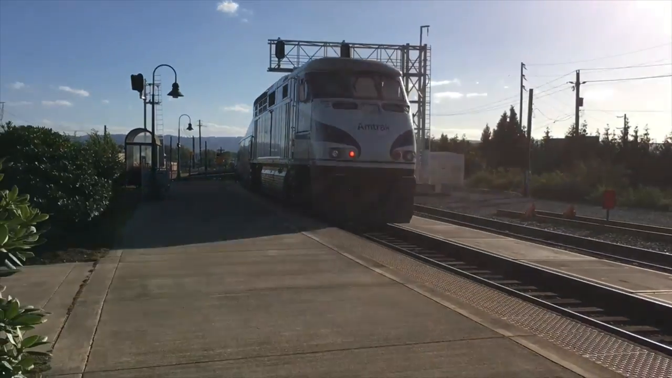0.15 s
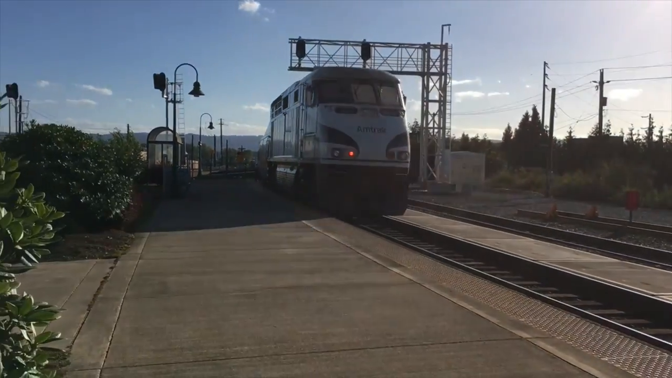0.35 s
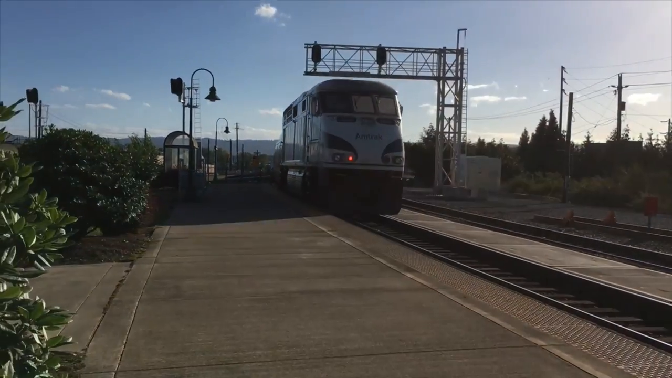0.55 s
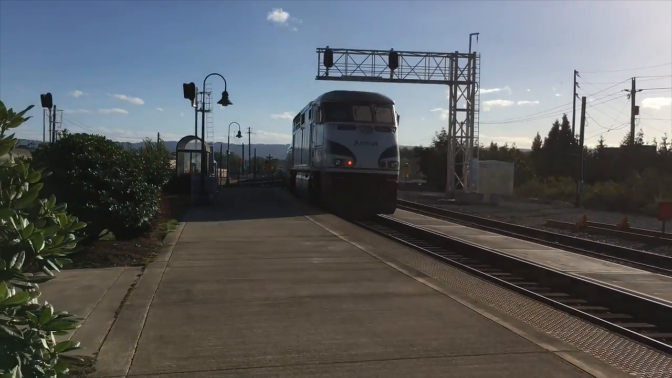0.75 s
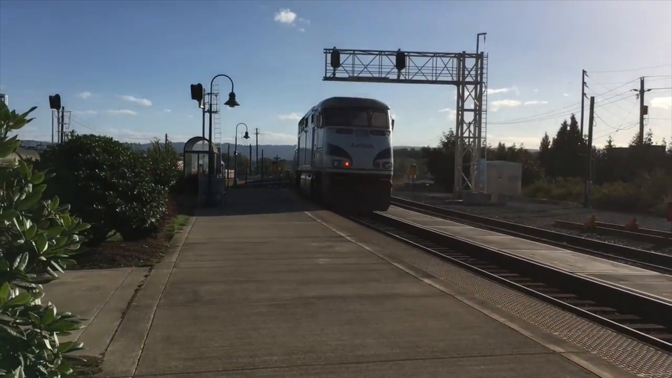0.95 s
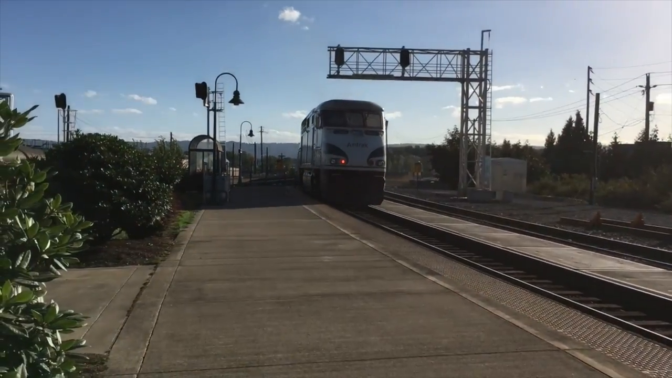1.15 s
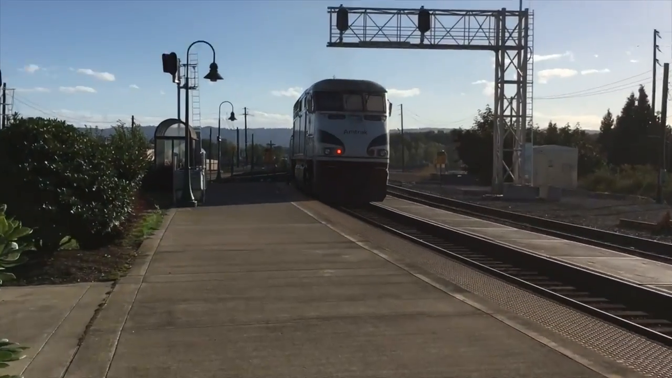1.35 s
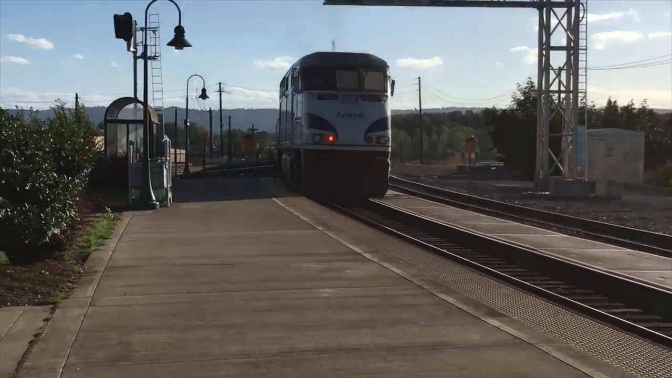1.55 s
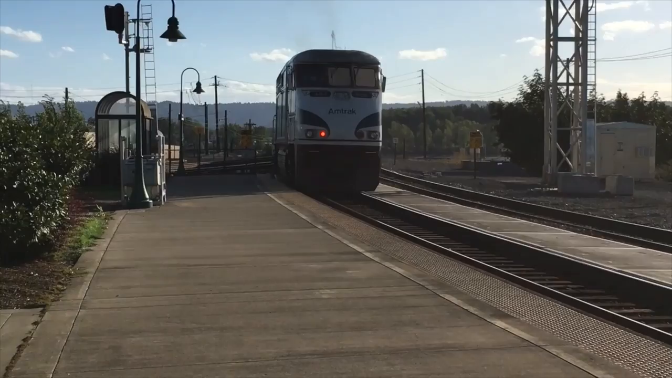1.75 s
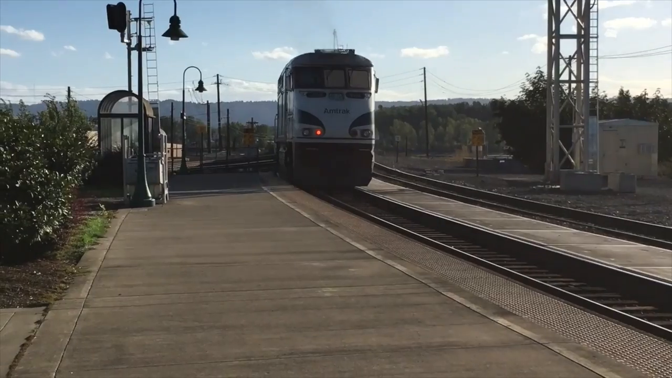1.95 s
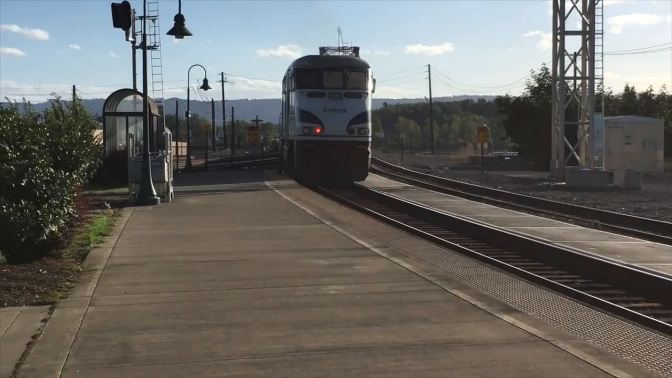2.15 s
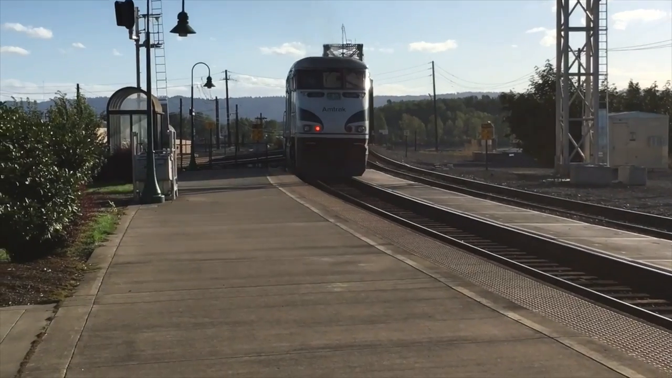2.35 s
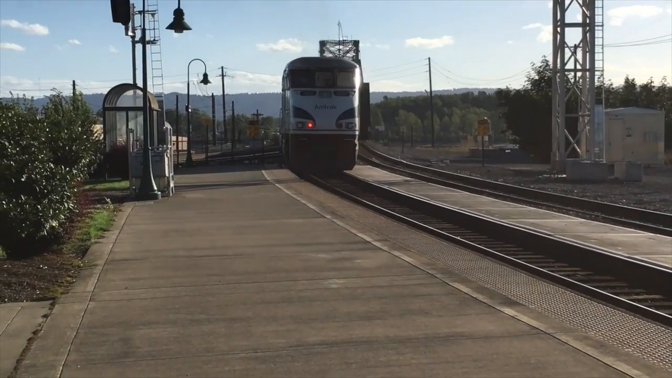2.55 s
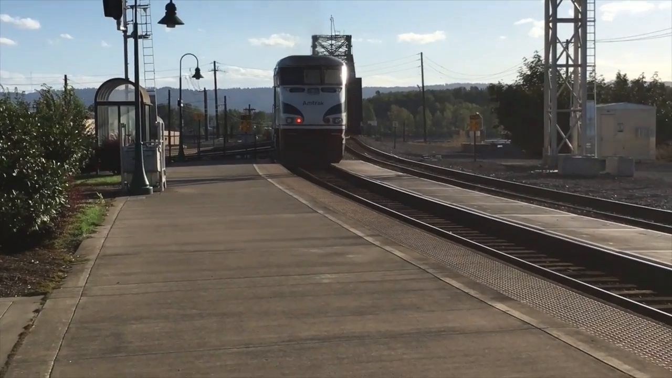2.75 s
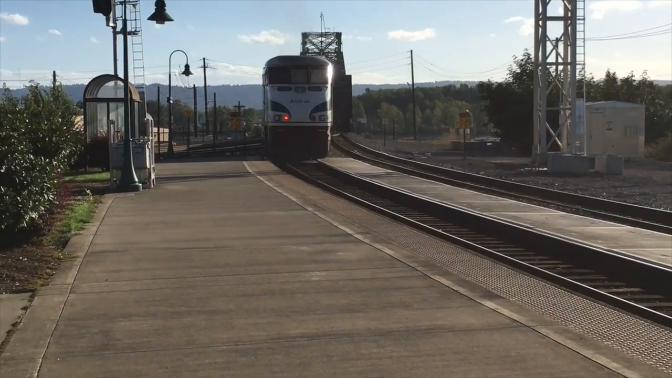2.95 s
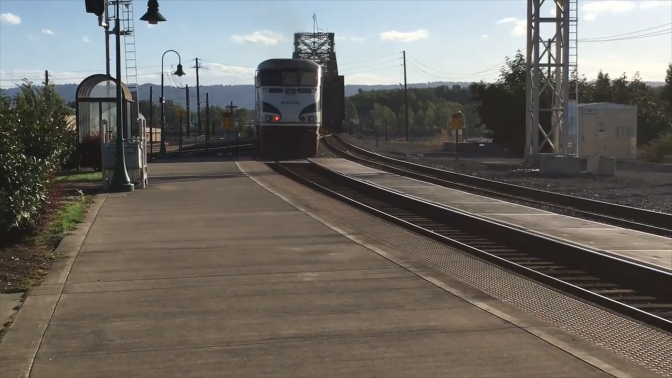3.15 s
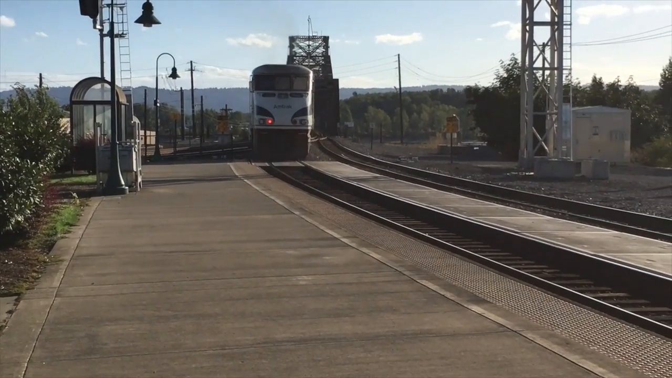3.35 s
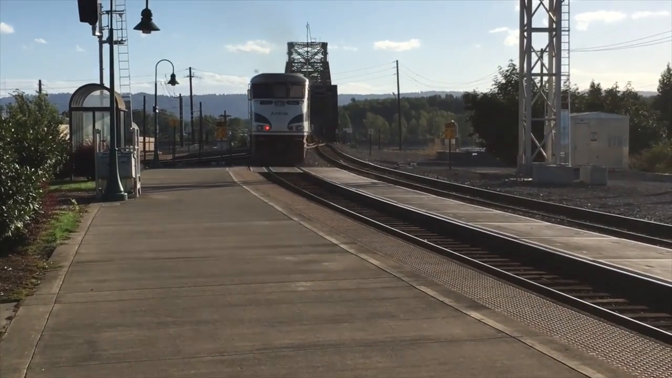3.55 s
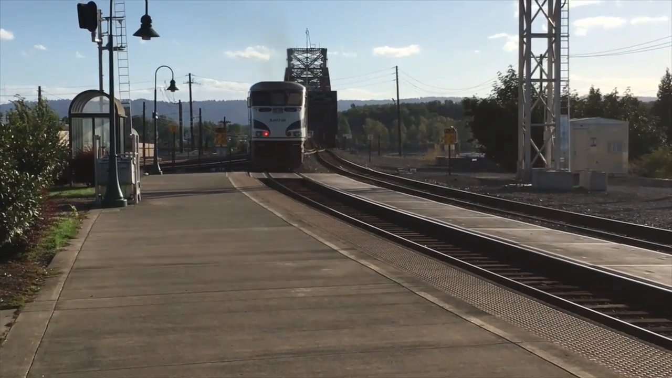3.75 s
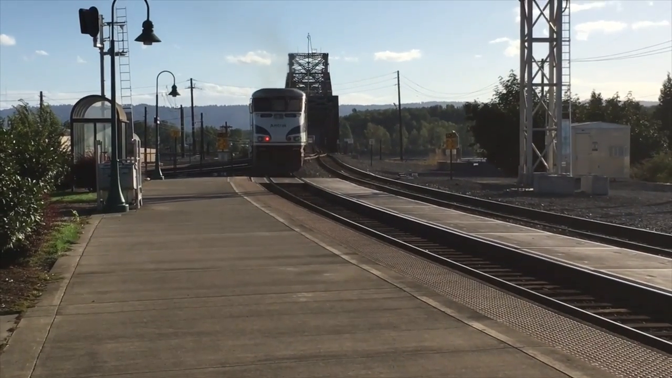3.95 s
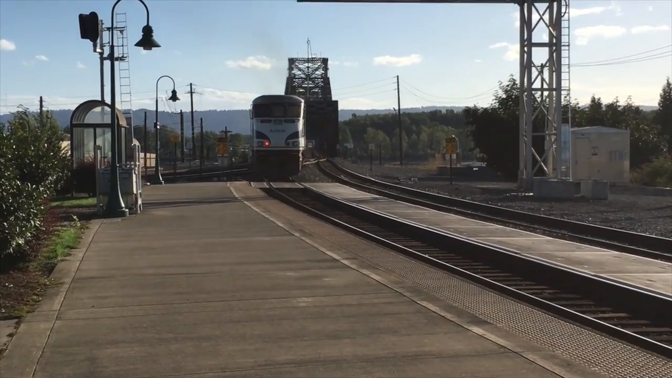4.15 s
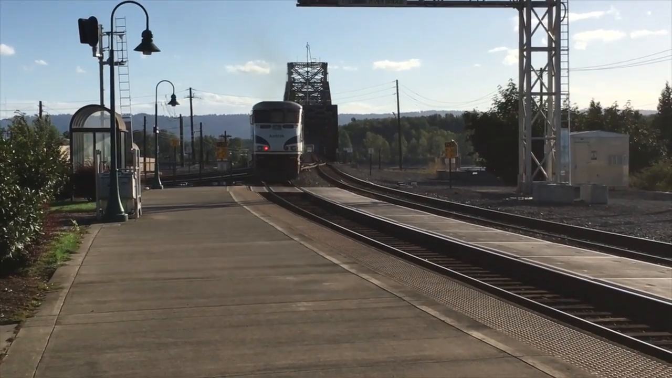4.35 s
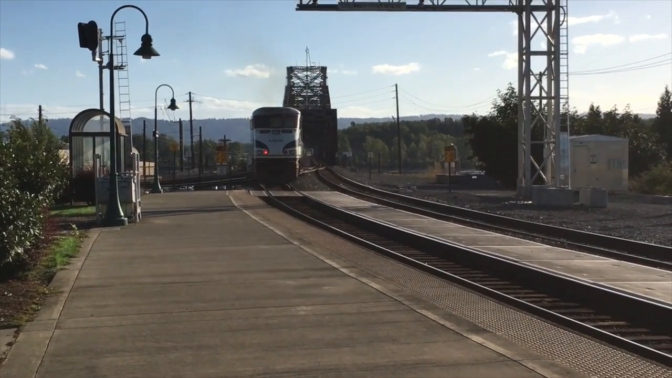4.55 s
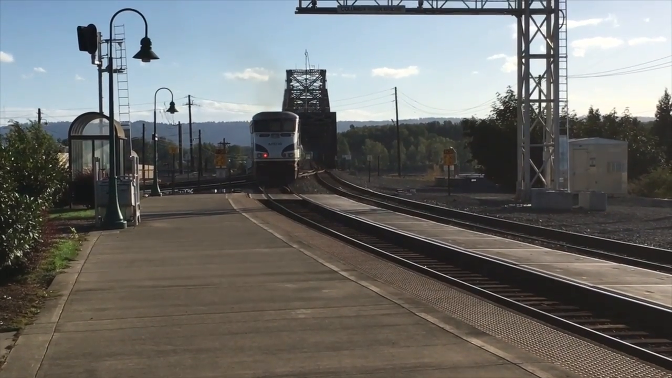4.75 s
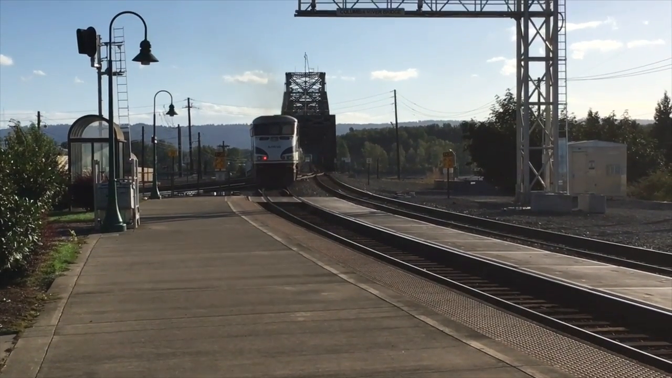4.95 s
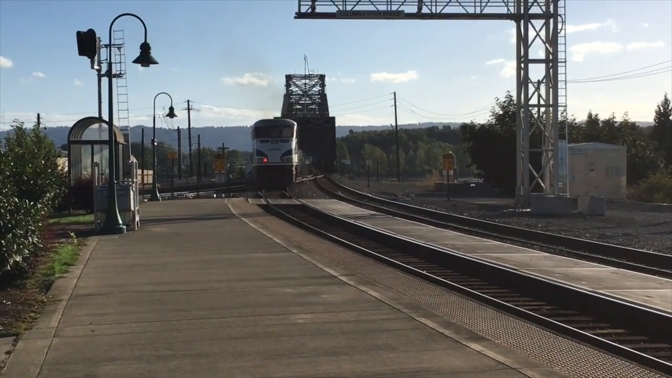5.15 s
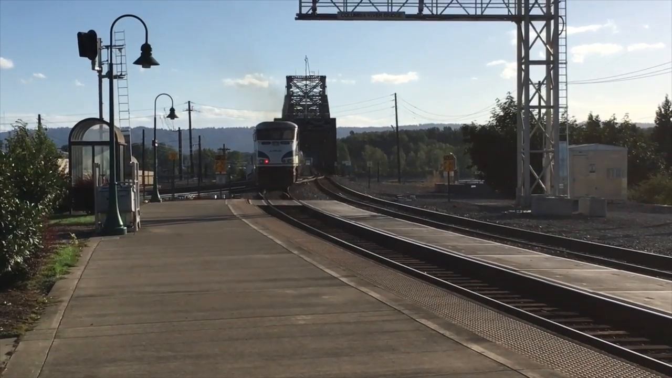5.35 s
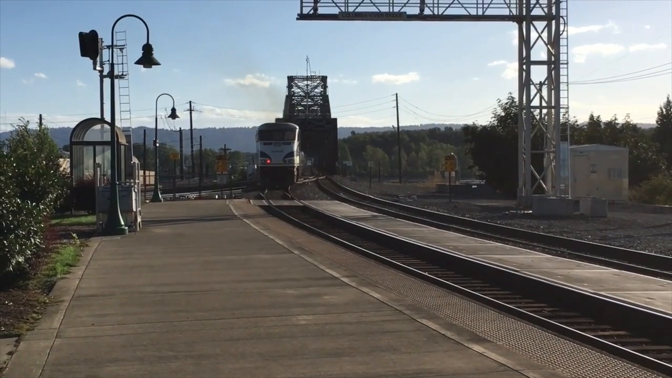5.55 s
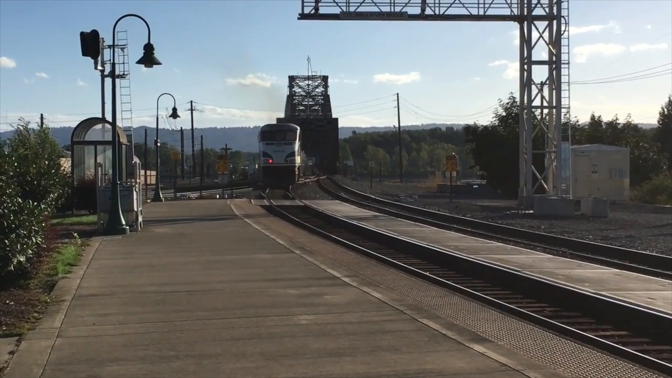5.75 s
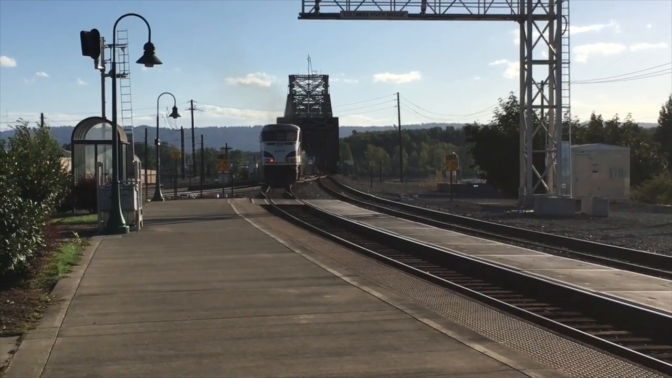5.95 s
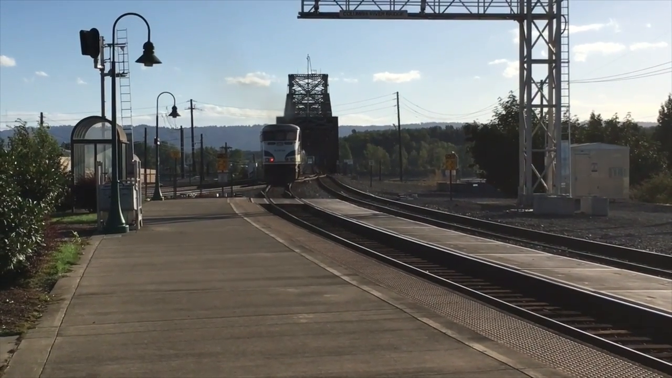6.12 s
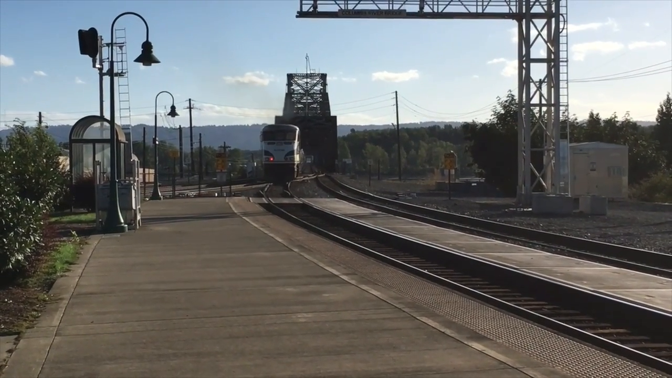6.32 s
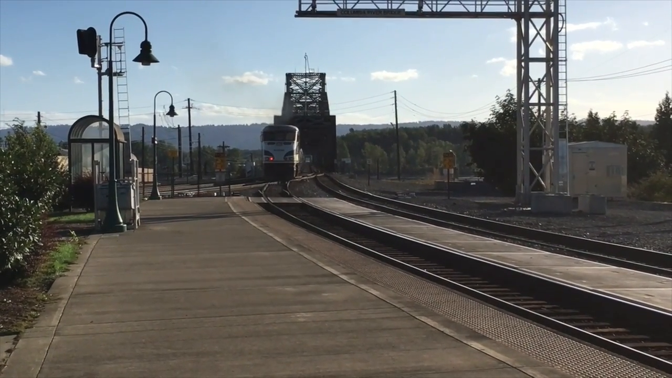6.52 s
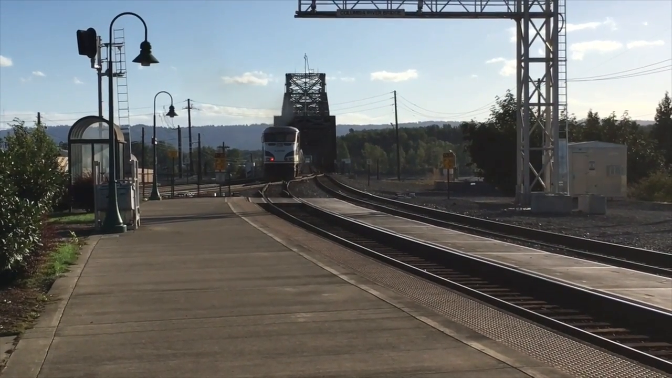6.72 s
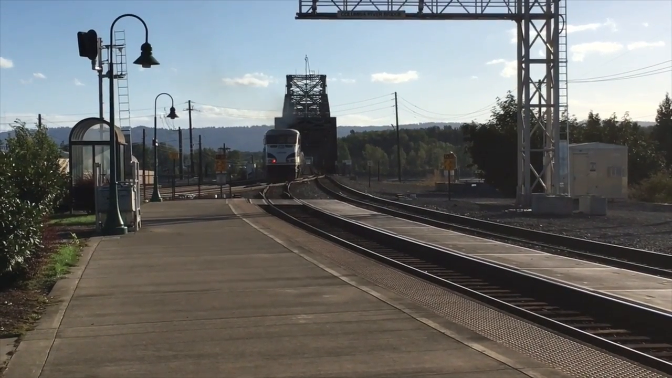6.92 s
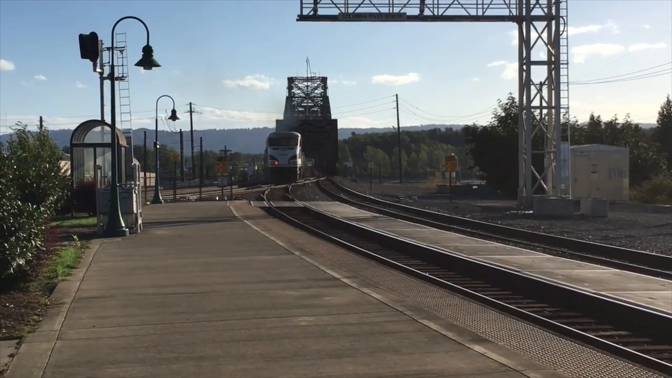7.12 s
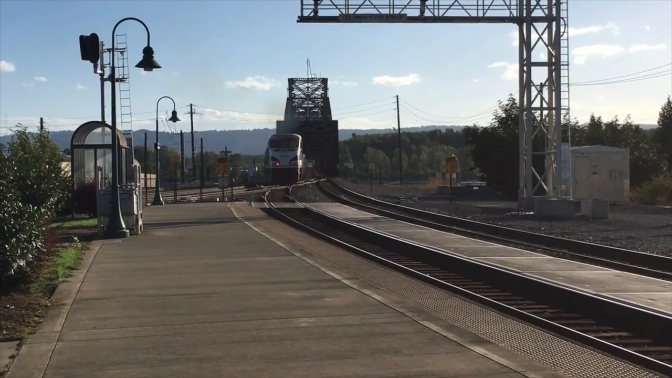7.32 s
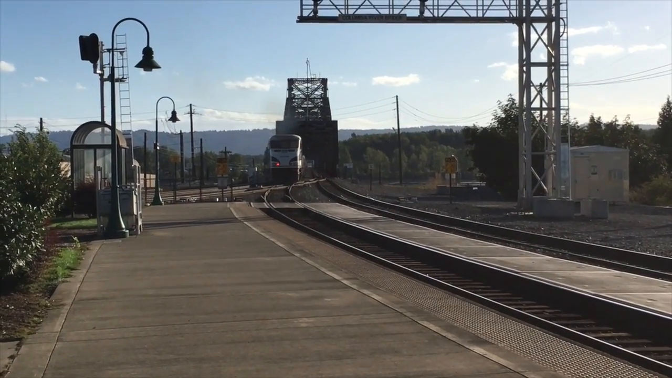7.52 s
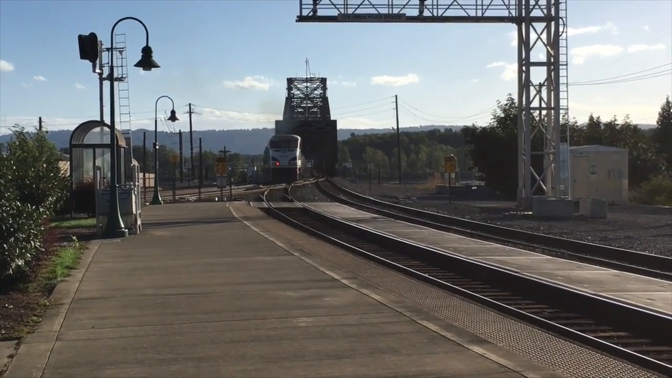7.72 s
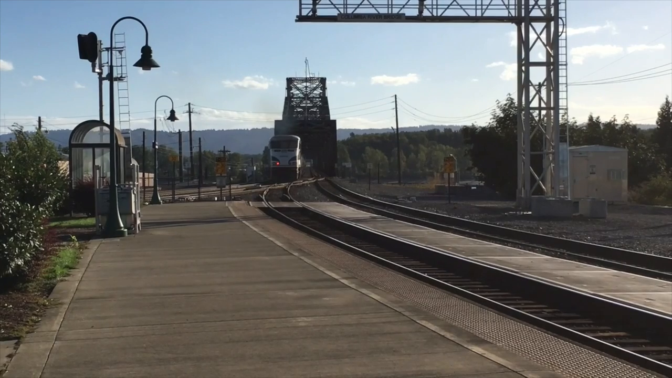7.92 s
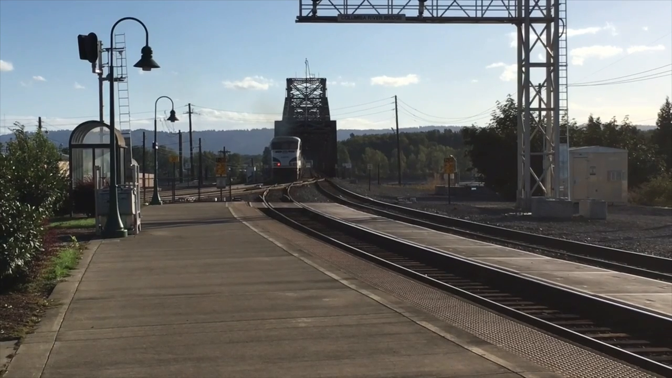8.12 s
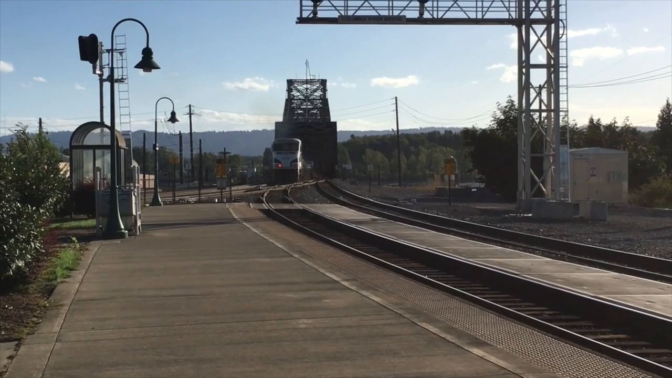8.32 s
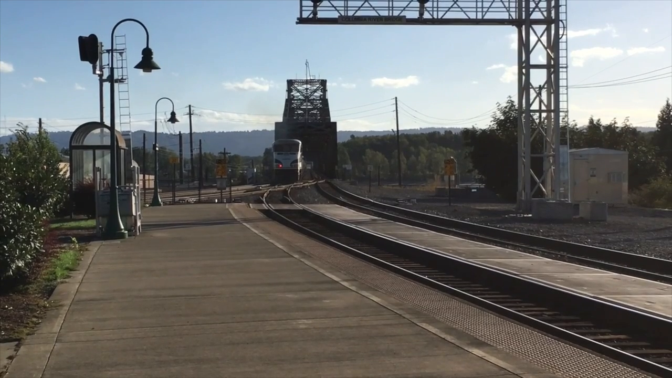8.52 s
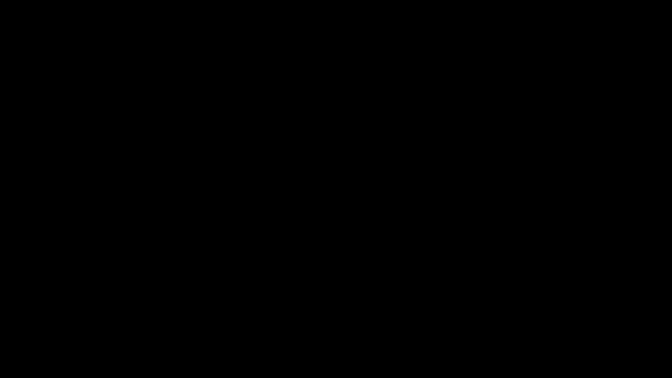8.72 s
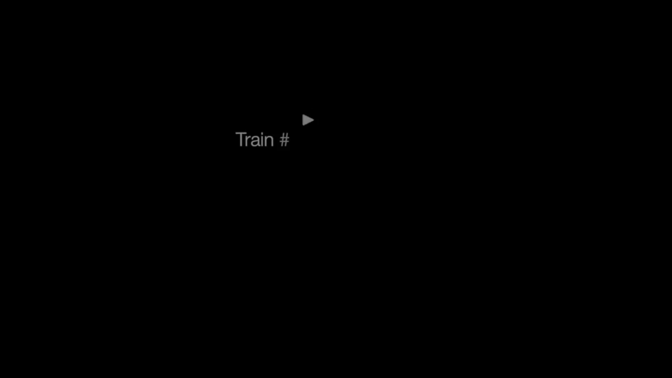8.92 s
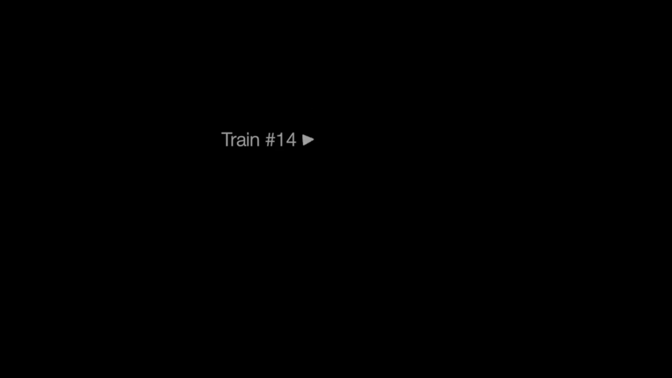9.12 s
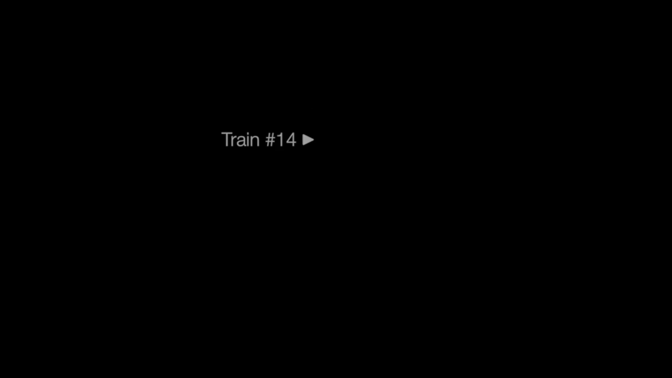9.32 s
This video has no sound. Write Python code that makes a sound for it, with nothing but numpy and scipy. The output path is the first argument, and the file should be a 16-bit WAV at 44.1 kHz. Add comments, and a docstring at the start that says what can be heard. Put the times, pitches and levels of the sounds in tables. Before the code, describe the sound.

Low pulsing diesel drone and gritty steel wheel scrape recede along curved track, fading duller, before abruptly switching to a soft, steady rushing hiss.

```python
"""A two-stroke diesel locomotive throbs at the tail of a passenger train rolling away from a platform.
The exhaust is a sum of crank orders; fans and gears are wandering sines. Cars and rails are shaped
noise, wheels patchy rubbing noise with snaps, flares and knocks. The rail roar weakens and the scrub
dulls as the train recedes. With a click the train gives way to a steady hiss of filtered noise."""
import sys
import numpy as np
from scipy import signal
from scipy.fft import rfft, irfft
from scipy.io import wavfile
from scipy.ndimage import uniform_filter1d

SR = 44100
rng = np.random.default_rng(int(sys.argv[2]) if len(sys.argv) > 2 else 0)


def file_out(sig):
    """Save sig as 16-bit WAV at sys.argv[1]."""
    # one column per channel
    cols = np.atleast_2d(sig).T
    # limit, then scale
    lim = np.clip(cols, -1, 1)
    pcm = np.round(lim * 32767).astype(np.int16)
    wavfile.write(sys.argv[1], SR, pcm)


N = 418051
T = np.arange(N) / SR
BINS_HZ = np.fft.rfftfreq(N, 1 / SR)
CUT_S = 8.667  # the train gives way to the hiss
EDGE_HZ = 15800  # the recorder's upper band edge
# far down the curve the train slips into the shadow of the ground
SHADOW_FROM_S, SHADOW_TAKES_S = 6.64, 1


def gain_of(db):
    """Decibels to amplitude."""
    return 10 ** (np.asarray(db) / 20)


def evened(x):
    """Scales to rms 1."""
    return x / np.sqrt(np.mean(abs(x) ** 2) + 1e-20)


def curve(rows):
    """A table of (s, value) rows, interpolated at every sample."""
    s, value = np.transpose(rows)
    return np.interp(T, s, value)


def spectrum_db(points, hz):
    """A spectrum table interpolated over log frequency."""
    f, db = np.transpose(points)
    return np.interp(np.log(hz + 1), np.log(f + 1), db)


def swell(s, span_s):
    """A smooth Gaussian rise to 1 and fall around the time s."""
    return np.exp(-.5 * ((T - s) / span_s) ** 2)


def shadow():
    """How far the train has passed into the shadow of the ground, 0 to 1."""
    return np.clip((T - SHADOW_FROM_S) / SHADOW_TAKES_S, 0, 1)


def drift(rate_hz):
    """Slow random wander of rms 1, low-passed by a Gaussian of width rate_hz."""
    count = 2048
    f = np.fft.rfftfreq(count, T[-1] / count)
    lowpass = np.exp(-.5 * (f / rate_hz) ** 2)
    slow = irfft(rfft(rng.standard_normal(count)) * lowpass)
    return np.interp(T, np.linspace(0, T[-1], count), evened(slow))


def noise(spectrum):
    """Steady noise of rms 1 with the given spectrum."""
    white = rfft(rng.standard_normal(N))
    return evened(irfft(white * gain_of(spectrum_db(spectrum, BINS_HZ)), N))


def friction(spectrum, patchy_db, flicker_db, dulling_db=0, ringing_db=1.83):
    """Rubbing noise of rms 1: resonances flare in patches; air takes more treble as the train recedes."""
    frame, hop = 1024, 256
    count, hz = N // hop + 5, np.fft.rfftfreq(frame, 1 / SR)
    real, imag, broad, narrow = rng.standard_normal((4, count, len(hz)))
    # smooth the patches over frames, then over frequency bins
    broad = evened(uniform_filter1d(uniform_filter1d(broad, size=20, axis=0), size=8, axis=1))
    narrow = evened(uniform_filter1d(uniform_filter1d(narrow, size=40, axis=0), size=2, axis=1))
    flicker = evened(uniform_filter1d(rng.standard_normal((count, 1)), size=5, axis=0))
    # dulling_db: treble tilt at EDGE_HZ from first to last frame, each frame's level kept
    distance = np.linspace(-.5, .5, count)[:, None]
    gain = gain_of(spectrum_db(spectrum, hz) - dulling_db * distance * (hz / EDGE_HZ) ** 2)
    shape = gain / np.linalg.norm(gain, axis=1, keepdims=True)
    patches = gain_of(patchy_db * broad + ringing_db * narrow + flicker_db * flicker)
    frames = (real + 1j * imag) * shape * patches
    rubbing = signal.istft(frames.T, nperseg=frame, noverlap=frame - hop)[1]
    return evened(rubbing[:N])


def tone(hz, width_hz, waver_db):
    """A sine of rms 1 that wanders in pitch and strength."""
    turns = np.cumsum(hz + width_hz * drift(7.4)) / SR
    return evened(np.sin(2 * np.pi * turns) * gain_of(waver_db * drift(3.8)))


# Crankshaft speed as heard from the platform. Each row: time in seconds, speed in turns per second.
CRANK_SPEED = [(0, 14.64), (1.5, 14.582), (3.5, 14.563), (5.7, 14.535), (7.5, 14.56)]
# Exhaust orders. Each row: multiple of the crank speed, swell level in dB re EXHAUST_DB,
# swell centre in seconds, Gaussian half length in seconds, far-off level in dB re EXHAUST_DB.
EXHAUST_ORDERS = [(4, -43, 3, 5, -46), (5, -25.6, 2.4, 2.3, -32.5), (6, -33.7, 3.3, 2.5, -48),
                  (7, -36, 1, 2.5, -54), (8, -25.8, .8, 2.9, -37), (9, -26.1, 1.9, 2.7, -42),
                  (10, -29.6, 2, 3.2, -56), (11, -36.5, 2.4, 2.8, -60), (12, -39.5, 3.5, 4.5, -54),
                  (13, -43, 2, 4.5, -64), (14, -42.3, 3.8, 2.6, -60), (15, -41, 5.3, 2.9, -58),
                  (16, -41, 2.2, 3.6, -49.5), (17, -45.5, 2, 3.2, -64), (19, -51, 5, 2.5, -66),
                  (20, -49.5, 3.2, 2.4, -66), (22, -55, 4, 2.5, -68), (23, -43.5, 4.7, 2.4, -62),
                  (26, -56, 4, 3.5, -64), (30, -61, 3, 3, -68)]
EXHAUST_DB = -0.3
# the silencer disperses each beat about its resonance
PIPE_ORDER, PIPE_SPREAD_CYCLES_PER_ORDER2 = 8.5, .18
# higher orders pass together, as one short puff
PUFF_FROM_ORDER, PUFF_LEAD_TURNS = 13, .402


def exhaust(fading_db=.4, far_fading_db=1.0, uneven_db=.7, smear_cycles=.15, weak_db=13,
            opening_db=18, opening_s=1.0, ground_loss_db_per_order=1.3):
    """Unequal cylinders repeat once a turn, so crank orders sound; each swells as the locomotive turns."""
    turns = np.cumsum(curve(CRANK_SPEED)) / SR + PUFF_LEAD_TURNS
    screened, grazing = np.clip(1 - T / opening_s, 0, 1), shadow()
    wavering_db = fading_db + far_fading_db * (T / CUT_S) ** 2
    puff_db = uneven_db * drift(7)
    top_db = max(row[1] for row in EXHAUST_ORDERS)
    out = np.zeros(N)
    for order, db, s, span_s, far_db in EXHAUST_ORDERS:
        # at first the roof screens the upper orders; from afar the ground soaks them up
        roof_db = opening_db * screened * (order > 13)
        ground_db = ground_loss_db_per_order * grazing * np.clip(order - 8, 0, 7)
        near = gain_of(db - roof_db - ground_db) * swell(s, span_s)
        size = np.hypot(near, gain_of(far_db)) * gain_of(wavering_db * drift(1.9))
        # shifting echoes smear the weaker orders most
        weakness = min((top_db - db) / weak_db, 1)
        cycles = order * turns + smear_cycles * weakness * drift(.5)
        # low orders linger in the silencer; high ones leave as an uneven puff
        if order < PUFF_FROM_ORDER:
            cycles = cycles - PIPE_SPREAD_CYCLES_PER_ORDER2 * (order - PIPE_ORDER) ** 2
        else:
            size = size * gain_of(puff_db)
        out -= size * np.sin(2 * np.pi * cycles)
    return gain_of(EXHAUST_DB) * np.sqrt(2) * out


# Fan and gear tones, with one wheel-mode tone near 1545 Hz. Each row: frequency in Hz, pitch wander
# in Hz rms, swell centre in seconds, Gaussian half length in seconds, rms level at the peak in dB.
STEADY_TONES = [(258.4, .15, 2.05, 1.05, -33.8), (258.2, .15, 5.7, 1.2, -41), (306.5, .3, .5, .6, -48),
                (775.5, .5, 1.25, .6, -45), (775, .5, 3.2, 1.7, -51.5), (1807, 1, 4.35, .6, -48),
                (1807, 2, 6.25, .35, -52), (2070, 2, 4.2, 1.2, -56), (1157, 2, .04, .08, -42),
                (1151.7, .8, 1.9, 1.2, -48), (1151, 1, 7.8, .8, -55.5), (598, 2, 3.4, 2, -55),
                (531, 2, 2.8, 2.5, -57), (1652, 2, 8.25, .2, -59), (877, 1, 7.9, .8, -59.5),
                (1063, 1, 7.8, .8, -61), (775, 1, 7.4, .7, -62.5), (1545, 8, 5.2, .8, -54)]


def humming():
    """Fans, gears and one wheel mode near 1545 Hz: wandering sines that swell and fade in the curve."""
    out = np.zeros(N)
    for hz, width_hz, s, span_s, db in STEADY_TONES:
        out += gain_of(db) * swell(s, span_s) * tone(hz, width_hz, waver_db=1.3)
    return out


# Low rumble of the cars. Each row: frequency in Hz, relative density in dB per Hz.
RUMBLE_SPECTRUM = [(15, -26), (32, -12.5), (55, 3), (85, 0), (115, -4.5), (150, -9), (200, -16), (300, -30),
                   (800, -100)]
RUMBLE_DB, RUMBLE_SHADOW_DB = -35, 3
# Hollow drone of the car bodies. Each row: frequency in Hz, relative density in dB per Hz.
BODY_SPECTRUM = [(100, -15), (170, -0.5), (230, 0), (320, 0), (400, -4.5), (470, -14.5), (900, -100)]
# the drone swells as the bodies turn side-on
BODY_DB, BODY_SWELL_DB, BODY_SHADOW_DB = -43.3, 2.5, 1.5
BODY_AT_S, BODY_SPAN_S = 3.9, 2.8
# Dull booms under the cars. Each row: centre in seconds, Gaussian half length in seconds, peak in dB.
BOOM_EVENTS = [(2.36, .12, -31), (3.885, .015, -27), (6.38, 0.11, -30), (7.105, .08, -35),
               (7.797, .09, -33)]
# Colour of the booms. Each row: frequency in Hz, relative density in dB per Hz.
BOOM_SPECTRUM = [(25, -18), (65, 4), (130, 5.5), (200, -9), (400, -47), (800, -100)]
# Rail roar. Each row: frequency in Hz, relative density in dB per Hz.
RAIL_SPECTRUM = [(350, -26), (470, -5.5), (600, 1), (800, 0.5), (1100, 0), (1300, -7), (1700, -31),
                 (2500, -62)]
# the roar falls slowly while the cars are near, then faster
RAIL_DB, RAIL_NEAR_UNTIL_S = -39.5, 4.57
RAIL_NEAR_DB_PER_S, RAIL_FAR_DB_PER_S = 0.41, 2


def rolling():
    """Cars rumble and boom, bodies drone, rails roar: noise bands weakened by distance or ground shadow."""
    rumble = gain_of(RUMBLE_DB - RUMBLE_SHADOW_DB * shadow()) * noise(RUMBLE_SPECTRUM)
    body_db = BODY_DB + BODY_SWELL_DB * swell(BODY_AT_S, BODY_SPAN_S) - BODY_SHADOW_DB * shadow()
    body = gain_of(body_db) * noise(BODY_SPECTRUM)
    boom_gain = sum(gain_of(db) * swell(s, span_s) for s, span_s, db in BOOM_EVENTS)
    booms = boom_gain * noise(BOOM_SPECTRUM)
    near_loss_db = RAIL_NEAR_DB_PER_S * np.minimum(T, RAIL_NEAR_UNTIL_S)
    far_loss_db = RAIL_FAR_DB_PER_S * np.maximum(T - RAIL_NEAR_UNTIL_S, 0)
    rail = friction(RAIL_SPECTRUM, patchy_db=1.03, flicker_db=0.5)
    return rumble + body + booms + gain_of(RAIL_DB - near_loss_db - far_loss_db) * rail


# Flange scrub and snaps. Each row: frequency in Hz, relative density in dB per Hz.
FLANGE_SPECTRUM = [(2000, -26), (2700, -5), (3080, -3.5), (3300, 0.9), (3550, 0), (4600, -1.5),
                   (4850, -6.5), (5250, -5), (5850, -5), (6150, -9), (6750, -11), (7200, -15.5),
                   (8500, -19), (11000, -33), (15000, -57.5)]


def grit(per_s=350, spread_db=3):
    """Sparse snaps of steel catching on steel, coloured by the flange resonances; rms 1."""
    sizes = gain_of(spread_db * np.minimum(rng.exponential(1, N), 4)) * rng.choice([-1, 1], N)
    snaps = sizes * (rng.random(N) < per_s / SR)
    return evened(irfft(rfft(snaps) * gain_of(spectrum_db(FLANGE_SPECTRUM, BINS_HZ)), N))


# Flange scrub along the curve, scrapes apart. Each row: time in seconds, level in dB.
SCRUB_LEVEL = [(0.0, -34), (0.07, -38), (1.46, -37), (1.63, -35.5), (1.85, -38.5), (2.15, -39),
               (2.44, -44.5), (2.7, -39.5), (2.96, -38), (3.21, -40.5), (4.17, -39.5), (4.3, -43),
               (4.7, -39), (5.03, -42.5), (5.51, -41), (5.75, -45.5), (6.3, -44), (7.88, -57.5),
               (8.6, -59.5)]
# Brief hard flange scrapes. Each row: centre in seconds, Gaussian half length in seconds, rise in dB.
FLANGE_SCRAPES = [(0.64, 0.024, 3.5), (1.074, 0.047, 2), (1.66, 0.059, 2), (3.833, 0.08, 3),
                  (4.167, 0.045, 2), (8.178, 0.039, 1.5)]
# Wheel disc ring. Each row: frequency in Hz, relative density in dB per Hz.
WHEEL_SPECTRUM = [(900, -34), (1250, -5), (1520, 1), (1720, -3), (2000, -0.5), (2300, -2.5), (2650, -9.5),
                  (3100, -17.5), (4500, -56)]
# Fine sizzle. Each row: frequency in Hz, relative density in dB per Hz.
SIZZLE_SPECTRUM = [(5000, -11), (7300, -4), (8500, -5.5), (10300, -8.5), (11400, -5), (12500, -11),
                   (13250, 1.5), (13700, 5), (14200, -4), (15000, -24)]
# FOLLOWS: dB per dB of change in the scrub
RING_DB, RING_FOLLOWS = -38, 0.59
# the discs ring louder while the curve turns their faces to the platform
FACING_S, FACING_SPAN_S, FACING_DB = 5.47, 1.63, 3.5
SIZZLE_DB, SIZZLE_FOLLOWS, SIZZLE_LOSS_DB_PER_S, SIZZLE_SHADOW_DB = -39, 0.5, 3.5, 4
# relative to the scrub
SNAP_DB, SNAP_RISE_DB_PER_S = -20, 1.5


def wheels():
    """Flanges scrub along the curve; the same rubbing rings the wheel discs, snaps and sizzles."""
    steady_db = curve(SCRUB_LEVEL)
    flange_db = steady_db + sum(db * swell(s, span_s) for s, span_s, db in FLANGE_SCRAPES)
    change_db = flange_db - steady_db[0]
    ring_db = RING_DB + RING_FOLLOWS * change_db + FACING_DB * swell(FACING_S, FACING_SPAN_S)
    sizzle_loss_db = SIZZLE_LOSS_DB_PER_S * T + SIZZLE_SHADOW_DB * shadow()
    sizzle_db = SIZZLE_DB + SIZZLE_FOLLOWS * change_db - sizzle_loss_db
    ring = gain_of(ring_db) * friction(WHEEL_SPECTRUM, patchy_db=1.14, flicker_db=0.5)
    scrub = gain_of(flange_db) * friction(FLANGE_SPECTRUM, patchy_db=1, flicker_db=0.9, dulling_db=65.0)
    snaps = gain_of(flange_db + SNAP_DB + SNAP_RISE_DB_PER_S * T) * grit()
    sizzle = gain_of(sizzle_db) * friction(SIZZLE_SPECTRUM, patchy_db=0.0, flicker_db=1.3, dulling_db=9.0)
    return ring + scrub + snaps + sizzle


# Highest wheel modes. Each row: frequency in Hz, rms level while close in dB.
SINGING_MODES = [(8520, -65), (9430, -65), (9640, -65), (11330, -68), (12066, -65), (12170, -67),
                 (12963, -61), (14581, -63), (15195, -63)]
# Bright fizz under them. Each row: frequency in Hz, relative density in dB per Hz.
FIZZ_SPECTRUM = [(5000, -23), (7000, -3), (9500, -9.5), (10400, -10), (12500, -2), (13650, 10), (14250, 4),
                 (15100, 11), (15700, 2)]
FIZZ_DB, CLOSE_UNTIL_S, CLOSE_FADE_S = -46, 2.29, .12


def singing(width_hz=9, flaring_db=3.2):
    """While the last wheels are close, their highest modes sing thinly over a bright fizz."""
    close = (1 - np.tanh((T - CLOSE_UNTIL_S) / CLOSE_FADE_S)) / 2
    modes = sum(gain_of(db) * tone(hz, width_hz, waver_db=flaring_db) for hz, db in SINGING_MODES)
    fizz = gain_of(FIZZ_DB) * friction(FIZZ_SPECTRUM, patchy_db=1.0, flicker_db=0.0)
    return close * (modes + fizz)


# Wheel and car modes, low groans to thin squeals. Each row: centre in seconds,
# Gaussian half length in seconds, frequency in Hz, Gaussian half width in Hz, peak level in dB.
MODE_FLARES = [(1.4, 1.0, 388, 14, -48), (1.2, .25, 640, 50, -43), (5.1, .25, 900, 250, -46),
               (7.06, 0.027, 840, 70, -47), (6.7, .3, 560, 70, -49), (0.27, 0.08, 1550, 80, -48),
               (.86, .07, 1980, 140, -45), (1.64, .06, 2100, 350, -43), (1.753, 0.057, 3270, 70, -47),
               (2.95, 0.3, 1420, 160, -45), (2.95, 0.062, 3370, 140, -47), (3.797, 0.084, 3300, 110, -46),
               (4.01, .03, 2250, 130, -41), (4.24, 0.11, 1480, 210, -39), (4.44, .1, 1680, 250, -40),
               (4.68, 0.13, 2000, 320, -42), (5.18, 0.09, 1450, 200, -38.5), (5.32, .05, 2200, 270, -42.5),
               (5.45, 0.17, 2470, 170, -45), (5.72, 0.072, 1544, 52, -43.5), (6.04, 0.044, 1900, 200, -37),
               (6.25, 0.25, 3350, 230, -48), (6.33, .09, 2050, 300, -43), (6.55, 0.16, 1470, 260, -41.5),
               (0.055, 0.065, 8600, 90, -46), (0.245, 0.063, 7639, 15, -49), (0.952, 0.18, 8470, 52, -53),
               (2.08, .08, 8420, 40, -55), (2.05, 0.15, 12965, 30, -52), (2.05, 0.1, 15305, 45, -53),
               (3.72, .09, 13600, 300, -55)]


def flares():
    """Wheel and car modes flare up, low groans to thin squeals: each a swelling, fading noise band."""
    out = np.zeros(N)
    for s, span_s, hz, width_hz, db in MODE_FLARES:
        near = abs(T - s) < 4 * span_s
        t = T[near] - s
        mode = np.exp(-.5 * ((np.fft.rfftfreq(len(t), 1 / SR) - hz) / width_hz) ** 2)
        ring = evened(irfft(rfft(rng.standard_normal(len(t))) * mode, len(t)))
        out[near] += gain_of(db) * np.exp(-.5 * (t / span_s) ** 2) * ring
    return out


# Wheels knocking on the track. Each row: start in seconds, level in dB, centre frequency in Hz.
TRACK_KNOCKS = [(0.358, -31, 1800), (1.655, -36, 2600), (2.1, -44, 3500), (4.477, -37, 1500),
                (7.535, -45.5, 1000)]


def knocks(decay_s=0.026, octaves=0.56, attack_s=0.001):
    """Short metallic knocks, each a decaying noise burst around one wheel resonance."""
    out = np.zeros(N)
    for s, db, hz in TRACK_KNOCKS:
        side = 2 ** octaves
        ring = noise([(hz / side ** 3, -70), (hz / side, -12), (hz, 0), (hz * side, -12), (hz * side ** 5, -70)])
        envelope = np.clip((T - s) / attack_s, 0, 1) * np.exp(-abs(T - s) / decay_s)
        out += gain_of(db) * ring * envelope
    return out


# Closing hiss. Each row: frequency in Hz, relative density in dB per Hz.
HISS_SPECTRUM = [(10, -7), (35, -2), (70, -3), (130, -10), (280, -15), (520, -18), (1130, -11),
                 (1400, -18.5), (1700, -30.5), (2900, -37), (4900, -42), (5800, -49), (14500, -63.5),
                 (15500, -77)]
HISS_DB = -28.5
CLICK_DB, CLICK_AT_S = -25, 8.668


def hiss():
    """A steady rush over a low rumble, as shaped noise, with a band-limited impulse as the click."""
    rush = gain_of(HISS_DB) * noise(HISS_SPECTRUM)
    click = gain_of(CLICK_DB) * np.sinc((T - CLICK_AT_S) * SR)
    return rush + click


def scene():
    """The departing train, then the hiss."""
    train = exhaust() + humming() + rolling() + wheels() + singing() + flares() + knocks()
    return np.where(T < CUT_S, train, hiss())[None]


def record(dry):
    """The recorder's band limit: a linear-phase low-pass."""
    lowpass = signal.firwin(511, EDGE_HZ, window=("kaiser", 9), fs=SR)
    return signal.oaconvolve(dry, lowpass[None], "same")


dry = scene()
out = record(dry)
file_out(out)
```